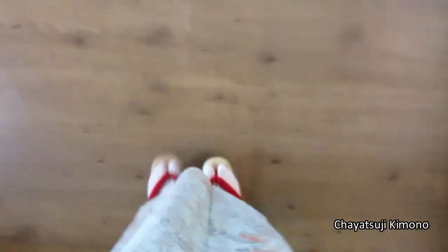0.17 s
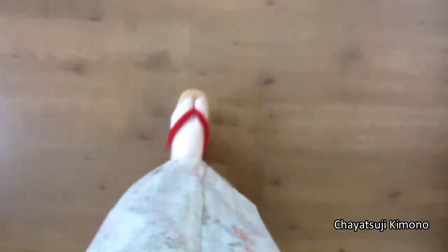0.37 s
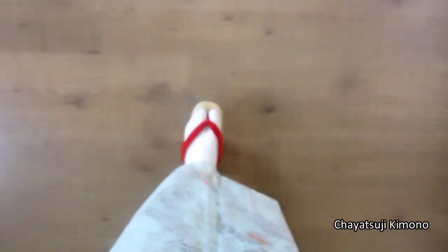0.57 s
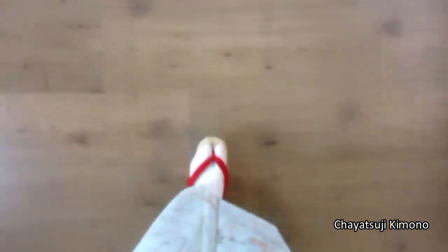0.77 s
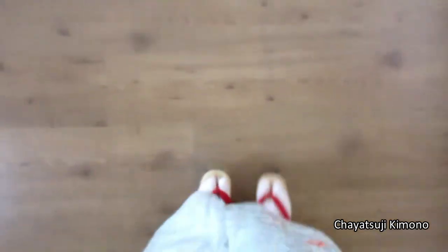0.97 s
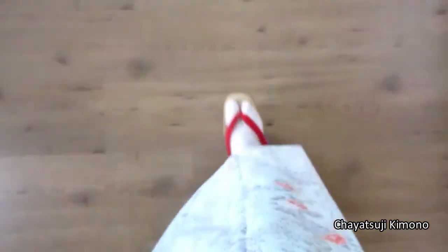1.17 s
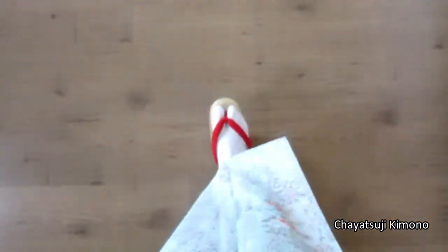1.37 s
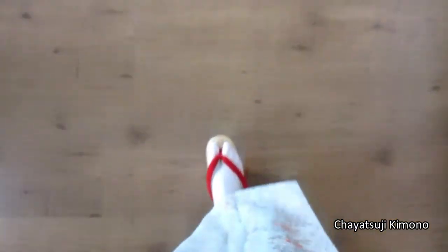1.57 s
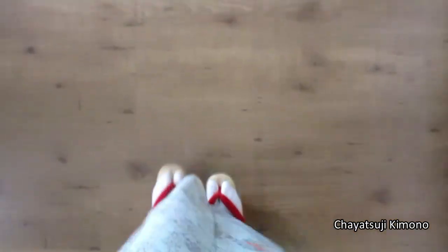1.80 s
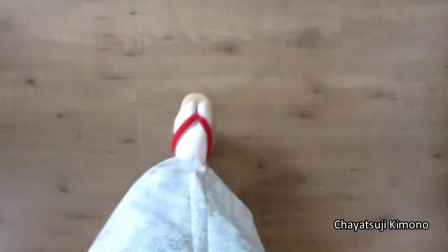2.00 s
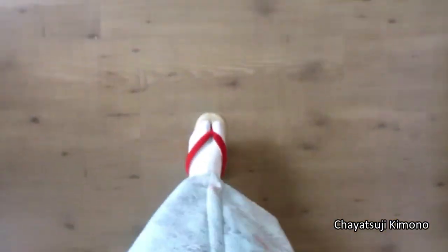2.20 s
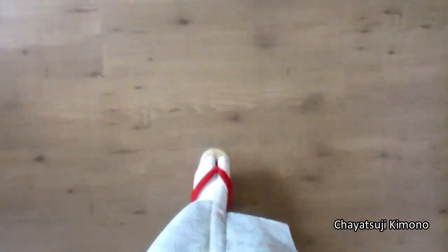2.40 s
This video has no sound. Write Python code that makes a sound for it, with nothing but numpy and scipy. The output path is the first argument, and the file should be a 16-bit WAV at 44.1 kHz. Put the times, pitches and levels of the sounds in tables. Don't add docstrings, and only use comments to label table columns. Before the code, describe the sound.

Little pellet bells rattle brightly with each walking step, wooden soles thudding on indoor floorboards

```python
import sys
import numpy as np
from scipy import signal
from scipy.io import wavfile
from scipy.ndimage import uniform_filter1d

SR = 44100
rng = np.random.default_rng(int(sys.argv[2]) if len(sys.argv) > 2 else 0)


def elevation(decibels):
    levels = np.asarray(decibels, float)
    return 10 ** (levels / 20)


def persist_wave(psi):
    counts = np.round(np.clip(psi, -1, 1) * 32767).astype(np.int16)
    wavfile.write(sys.argv[1], SR, np.atleast_2d(counts).T)


N = 108045


def evened(x):
    return x / np.sqrt(np.mean(x ** 2) + 1e-20)


def read(points, hz):
    f, value = np.transpose(points)
    return np.interp(np.log(hz + 1), np.log(f + 1), value)


def envelope(points):
    return elevation(np.interp(np.arange(N) / SR, *np.transpose(points)))


def clicks(times, sizes):
    at = np.round(np.asarray(times) * SR).astype(int)
    return np.bincount(np.clip(at, 0, N - 1), sizes, N)


def ring(x, hz, t60, rise_s=0.00027):
    t = np.arange(SR // 2) / SR
    tone = np.sin(2 * np.pi * hz * t) * elevation(-60 * t / t60) * (1 - np.exp(-t / rise_s))
    return signal.oaconvolve(x, tone)[:N]


def burst(length_s, edges_hz):
    x = rng.standard_normal(1500) * np.exp(-np.arange(1500) / SR / length_s)
    return signal.sosfilt(signal.butter(2, edges_hz, "bandpass", fs=SR, output="sos"), x)


def add(mix, s, sound):
    part = mix[round(s * SR):][:len(sound)]
    part += sound[:len(part)]


def hiss(spectrum, patchy_db):
    hz = np.fft.rfftfreq(1024, 1 / SR)
    a, b, patches = rng.standard_normal((N // 256 + 5, 513, 3)).T
    patches = uniform_filter1d(patches, size=14, axis=0)
    patches = evened(uniform_filter1d(patches, size=10, axis=1))
    gain = elevation(read(spectrum, hz)[:, None] + patchy_db * patches)
    noise = signal.istft((a + 1j * b) * gain, nperseg=1024, noverlap=768)[1]
    return evened(noise[:N])


def background():
    # (frequency [Hz], density [dB per Hz])
    air_colour = [(12, -43), (20, -7.5), (93, -5.5), (316, -5.5), (708, -7), (3020, -8.5), (4710, -13.5),
                  (14900, -28.5), (15700, -38)]
    # (frequency [Hz], density [dB per Hz])
    cloth_colour = [(900, -7.5), (2000, -31), (4000, 7.5), (8000, 3), (12000, -3), (15500, -35)]
    # (time [s], level [dB])
    cloth_swell = [(0, -60), (.12, -67), (.3, -51), (.58, -71), (.86, -57), (1.1, -62), (1.3, -58.5),
                   (1.48, -65.5), (1.63, -55), (1.75, -61.5), (2.05, -52), (2.2, -67), (2.32, -63),
                   (2.45, -55.5)]
    # (time [s], level [dB])
    hum_swell = [(0, -66), (.54, -87), (.6, -61), (1.12, -59.5), (1.2, -75), (2.45, -73)]
    air_db, cloth_db, patchy_db = -50, 0.5, 2.5
    hum_hz, hum_width_hz = 85, 5.4
    pole = np.exp(-np.pi * hum_width_hz / SR)
    wander = evened(signal.lfilter([1], [1, -pole], rng.standard_normal(N)))
    carrier = np.exp(2j * np.pi * hum_hz * np.arange(N) / SR)
    hum = evened((carrier * (3.0 + wander)).real) * envelope(hum_swell)
    air = elevation(air_db) * hiss(air_colour, patchy_db)
    cloth = elevation(cloth_db) * envelope(cloth_swell) * hiss(cloth_colour, patchy_db)
    return air + hum + cloth


def knocks():
    # (time [s], peak [dB], hollow tone [dB], wall tone [dB], rim tone [dB])
    pocket_hits = [
        (0.1311, -21, -22, -5.5, -17),
        (0.2418, -15, -15.5, -35, -9),
        (0.9572, -34, -10, -25, -12),
        (0.9687, -19.5, -10.5, -6.5, -22),
        (0.998, -31, -20, -10, 3),
        (1.0989, -13, -34, -12, 0),
        (1.1124, -18.5, -13.5, -14, -8),
        (1.1423, -29, -7, -3, -18),
        (1.7823, -36.5, -27, 1, -30),
        (1.8687, -18, -10, -12, -25),
    ]
    # (frequency [Hz], t60 [s])
    pocket_tones = [(780, 0.024), (2350, 0.052), (3880, 0.018)]
    # (frequency [Hz], level [dB], t60 [s])
    wood_chips = [(2295, -4.5, 0.024), (2576, -1, 0.03), (1017, -12, 0.015)]
    # (time [s], peak [dB], low edge [Hz], high edge [Hz])
    slit_grazes = [(.2075, -20, 3200, 4730), (.229, -26, 3300, 4800), (0.2825, -16.5, 3200, 4700),
                   (1.058, -23, 3300, 4750), (1.146, -21, 2400, 4600), (1.151, -16.5, 2400, 4300),
                   (1.266, -19, 2400, 4030), (1.498, -28, 2400, 3500), (1.905, -30.5, 3200, 5860),
                   (1.93, -24, 3200, 5500), (2.27, -31, 2400, 4000), (2.278, -34.5, 2400, 4220),
                   (.2425, -25, 4400, 6500), (.302, -30, 8000, 10500), (1.088, -22, 7000, 8500),
                   (1.101, -23.5, 4480, 8900), (1.113, -28, 4020, 7600), (1.157, -30, 6000, 13000),
                   (1.438, -41, 4000, 11000)]
    clack_db, clack_s, clack_hz = -4.5, 0.0031, (730, 3740)
    graze_s = 0.0016
    s, peak_db, *tones_db = np.transpose(pocket_hits)
    out = np.zeros(N)
    luck_db = 2 * rng.standard_normal((len(wood_chips), len(s)))
    for (hz, db, t60), u in zip(wood_chips, luck_db):
        out += ring(clicks(s, elevation(peak_db + db + u)), hz, t60, rise_s=0.0016)
    for (hz, t60), db in zip(pocket_tones, tones_db):
        out += ring(clicks(s, elevation(peak_db + db)), hz, t60, rise_s=0.001)
    for start, db in zip(s, peak_db):
        add(out, start, elevation(db + clack_db) * burst(clack_s, clack_hz))
    for start, db, *edges_hz in slit_grazes:
        add(out, start, elevation(db) * burst(graze_s, edges_hz))
    return out


def bell(strikes, shell, overtones):
    # (time [s], level [dB])
    belly_favour = [(.13, 3.5), (.2, -5), (.265, 3.5), (.33, -2), (.97, -10), (1.02, -5), (1.13, 4),
                    (1.17, -5), (1.21, 2.5), (1.27, 3), (1.8, -5), (1.89, -2.5), (1.95, -13), (2.4, -4)]
    belly_top_hz, overtone_scatter_db = 8000, 4.0
    shell_rise_s, shell_detune = 0.0017, 0.0013
    caught_t60 = 0.021
    snap_hz, snap_spread, snap_db, snap_t60 = 3650, 0.08, -23, 0.006
    strike_db, tick_db, tick_s, tick_hz = -1, -10, 0.0033, (2980, 10500)
    bounces_per_s, bounce_db, bounce_t60, bounce_spread_db, bounce_shell_db = 300, -11.5, 0.14, 2.5, -10
    bell_low_hz = 2315

    s, peak_db, share, bright_db, t60s = np.transpose(strikes)
    size, share = elevation(peak_db + strike_db), np.clip(share, 0, 1)
    t = np.arange(SR // 4) / SR
    luck = rng.standard_normal((len(s), 3 + len(overtones)))
    bounce = rng.choice([-1., 1.], N) * (rng.random(N) < bounces_per_s / SR)
    bounce = bounce * elevation(bounce_db + bounce_spread_db * np.minimum(rng.exponential(1, N), 2))

    def rattle(weights):
        dying = signal.oaconvolve(clicks(s, weights), elevation(-60 * t / bounce_t60))[:N]
        return 2 * rng.random(N) * bounce * dying

    out = np.zeros(N)
    for hz in shell[:2]:
        out += ring(elevation(bounce_shell_db) * rattle(size), hz, shell[2], rise_s=shell_rise_s)
    gaps = np.diff(s, append=9)
    for start, gap, a, up, t60, u in zip(s, gaps, size, share, t60s, luck):
        caught = np.maximum(t - gap, 0) / caught_t60
        fade = (1 - np.exp(-t / shell_rise_s)) * elevation(-60 * (t / t60 + caught))
        shell_hz = np.array(shell[:2]) * (1 + shell_detune * u[:2])
        low, high = np.sin(2 * np.pi * np.outer(shell_hz, t))
        snap = np.sin(2 * np.pi * snap_hz * (1 + snap_spread * u[2]) * t)
        snap = snap * elevation(snap_db - 60 * t / snap_t60)
        add(out, start, a * (fade * ((1 - up) * low + up * high) + snap))
    favour_db = np.interp(s, *np.transpose(belly_favour))
    for (hz, db, t60), u in zip(overtones, luck.T[3:]):
        weights = size * elevation(bright_db + db + overtone_scatter_db * u + (hz < belly_top_hz) * favour_db)
        out += ring(clicks(s, weights) + rattle(weights), hz, t60, rise_s=0.0018)
    weights = size * elevation(bright_db + tick_db)
    out += signal.oaconvolve(clicks(s, weights) + rattle(weights), burst(tick_s, tick_hz))[:N]
    return signal.sosfilt(signal.butter(4, bell_low_hz, "highpass", fs=SR, output="sos"), out)


def left_bell():
    # (time [s], peak [dB], share of upper shell tone [0-1], overtones [dB], ring t60 [s])
    first_swing = [(0.1314, -15.5, 0.72, -15.5, 0.071), (0.1527, -23, 1, -8.5, 0.047),
                   (0.1587, -11, 0.65, -39, 0.025), (0.167, -14.5, 0.44, -29, 0.052),
                   (0.2075, -7.5, 0.78, -35, 0.11), (0.2151, -3.5, 0.37, -27, 0.11),
                   (0.2285, -4.5, 0.53, -36, 0.065), (0.2445, -5, 0.96, -40, 0.033),
                   (0.255, -12, 0.6, -22, 0.039), (0.2647, -13.5, 0.7, -22, 0.089),
                   (0.2858, 2, 0.99, -31.5, 0.054), (0.2949, -13, 0.2, -25, 0.022),
                   (0.3134, -10, 0.9, -38, 0.084), (0.3445, -19, 0.83, -20, 0.082),
                   (0.3717, -17.5, 0.75, -31, 0.082), (0.4023, -16.5, 0.84, -30.5, 0.02),
                   (0.419, -25.5, 0.66, -34, 0.053), (0.447, -24, 0, -30, 0.03),
                   (0.5324, -24.5, 0.54, -39, 0.04), (0.6668, -33, 0.6, -35, 0.056),
                   (0.76, -38, 0.6, -31, 0.09)]
    # (time [s], peak [dB], share of upper shell tone [0-1], overtones [dB], ring t60 [s])
    third_swing = [(1.7017, -35, 0.21, -32, 0.036), (1.7468, -29.5, 0.6, -22, 0.07),
                   (1.812, -26.5, 0.61, -16.5, 0.076), (1.8237, -21.5, 0.67, -30.5, 0.12),
                   (1.8716, -3, 0.96, -35, 0.21), (1.8774, -3.5, 0.25, -33, 0.049),
                   (1.8879, -18.5, 0.81, -15, 0.05), (1.906, -7.5, 0.82, -25.5, 0.039),
                   (1.9144, -11, 0.51, -45, 0.043), (1.928, -4, 0.62, -36, 0.037),
                   (1.9366, -16, 0.38, -24, 0.066), (1.9519, -12.5, 0.4, -47, 0.067),
                   (1.9836, -19.5, 0.52, -40, 0.067), (2.0321, -18.5, 1, -36, 0.063),
                   (2.046, -32, 0.77, -33, 0.06), (2.2075, -25, 0.97, -42, 0.031),
                   (2.269, -33, 0.93, -32, 0.067), (2.2723, -26, 0.23, -40, 0.034),
                   (2.377, -23.5, 0.76, -28, 0.036), (2.3941, -19.5, 0.79, -33, 0.093),
                   (2.4016, -16, 0.96, -45, 0.062), (2.4088, -21.5, 0.9, -40, 0.051)]
    # (lower [Hz], upper [Hz], t60 [s])
    left_shell = (2935, 3075, 0.059)
    # (frequency [Hz], level [dB], t60 [s])
    left_overtones = [(6360, -11, 0.068), (6726, -4.5, 0.092), (11380, -6.5, 0.054), (12500, -6, 0.041),
                      (14700, -30, .02), (15400, -38, .02)]
    return bell(first_swing + third_swing, left_shell, left_overtones)


def steps():
    # (time [s], peak [dB], pitch [Hz])
    footfalls = [
        (0.5525, -10.5, 520),
        (1.333, -42, 240),
        (1.654, -39, 515),
        (2.171, -14.5, 465),
    ]
    # (frequency [Hz], level [dB], t60 [s])
    near_boards = [(154, -27, 0.083), (339.4, -19.5, 0.26), (496, -19, 0.068), (576, -30, .12),
                   (627, -21, 0.18), (705, -18, 0.26)]
    # (frequency [Hz], level [dB], t60 [s])
    far_boards = [(157, -16, 0.23), (267, -22.5, .15), (433, -11.5, 0.13), (520, -16, 0.13),
                  (640, -20, 0.049)]
    thud_t60, thud_rise_s, lag_s = 0.017, 0.00036, 0.00324
    low_hz, top_hz = 123, 771
    out = np.zeros(N)
    for (s, peak_db, pitch_hz), boards in zip(footfalls, [near_boards] * 3 + [far_boards]):
        out += ring(clicks([s + lag_s], [-2.2 * elevation(peak_db)]), pitch_hz, thud_t60, rise_s=thud_rise_s)
        for hz, db, t60 in boards:
            out += ring(clicks([s + lag_s], [elevation(peak_db + db)]), hz, t60, rise_s=0.0072)
    out = signal.sosfilt(signal.butter(2, low_hz, "highpass", fs=SR, output="sos"), out)
    return signal.sosfilt(signal.butter(10, top_hz, fs=SR, output="sos"), out)


def right_bell():
    # (time [s], peak [dB], share of upper shell tone [0-1], overtones [dB], ring t60 [s])
    second_swing = [(0.9594, -34, 0.94, -50, 0.08), (0.9717, -8.5, 0.66, -21.5, 0.08),
                    (0.9828, -15, 0.25, -18, 0.087), (1.0013, -11.5, 0.87, -23, 0.06),
                    (1.0234, -5.5, 1, -23, 0.05), (1.0351, -20.5, 0.49, -7, 0.034),
                    (1.046, -15.5, 0.79, -30, 0.08), (1.059, -7.5, 0.87, -23, 0.061),
                    (1.067, -9, 0.36, -35, 0.19), (1.0755, -0.5, 0.89, -21.5, 0.038),
                    (1.1017, -8.5, 0.71, -24.5, 0.13), (1.111, 2, 0.44, -37.5, 0.03),
                    (1.1244, -5.5, 0.91, -27.5, 0.064), (1.139, -9.5, 1, -23, 0.075),
                    (1.1505, -1.5, 0.3, -27.5, 0.029), (1.17, -7.5, 0.37, -24, 0.052),
                    (1.1954, -8.5, 0.52, -21.5, 0.018), (1.2319, -18, 0.57, -18, 0.085),
                    (1.266, -4, 0.83, -21.5, 0.063), (1.2742, -12, 0.42, -22.5, 0.04),
                    (1.286, -16, 0.43, -26, 0.051), (1.499, -20.5, 0.12, -37, 0.027)]
    # (lower [Hz], upper [Hz], t60 [s])
    right_shell = (2850, 2960, 0.047)
    # (frequency [Hz], level [dB], t60 [s])
    right_overtones = [(6385, -9, 0.058), (6760, -7, 0.051), (11442, -5.5, 0.061), (12400, -9.5, 0.039),
                       (14500, -23, .02), (14400, -15, 0.021), (14750, -21, .02), (14950, -14, .022)]
    return bell(second_swing, right_shell, right_overtones)


def scuff():
    # (time [s], level [dB])
    slide_swell = [(1.16, -56.5), (1.2, -45), (1.225, -42.5), (1.25, -42.5), (1.3, -52), (1.38, -54.5),
                   (1.46, -88)]
    # (frequency [Hz], density [dB per Hz])
    slide_colour = [(250, -20), (420, -7.5), (620, 1.5), (740, -1.5), (1000, -21), (3000, -58)]
    return envelope(slide_swell) * hiss(slide_colour, patchy_db=1.5)


def room(x):
    # (frequency [Hz], t60 [s])
    room_decay = [(150, 0.76), (500, 0.27), (3000, 0.43), (7000, 0.23), (14000, 0.21)]
    taps = np.zeros(SR)
    at = np.arange(260, SR - 20, 20)
    taps[at + rng.integers(0, 20, len(at))] = rng.choice([-1., 1.], len(at))
    hz, t, z = signal.stft(taps, SR, nperseg=256)
    fade = elevation(-60 * t / read(room_decay, hz)[:, None])
    tail = signal.istft(z * fade, SR, nperseg=256)[1]
    return signal.fftconvolve(x, tail / np.linalg.norm(tail))[:N]


def scene():
    bells = left_bell() + right_bell()
    wood, soles = knocks(), steps()
    bell_room_db, knock_room_db, step_room_db = -8.5, -5.5, -8
    wet = room(elevation(bell_room_db) * bells + elevation(knock_room_db) * wood + elevation(step_room_db) * soles)
    return (bells + wood + soles + wet + scuff() + background())[None]


def roll_off(x):
    return signal.sosfilt(signal.butter(12, 15770, fs=SR, output="sos"), x)


def record(dry):
    treble_limit = signal.firwin(255, 15720, fs=SR)[None]
    mix = signal.oaconvolve(dry, treble_limit, "same")
    return roll_off(mix)


dry = scene()
out = record(dry)
persist_wave(out)
```